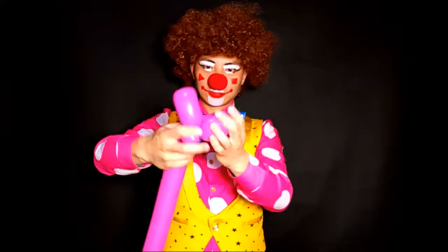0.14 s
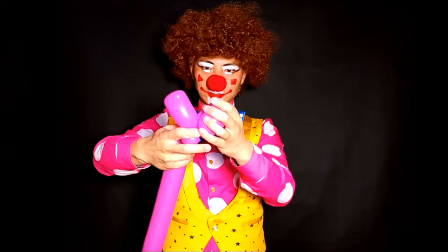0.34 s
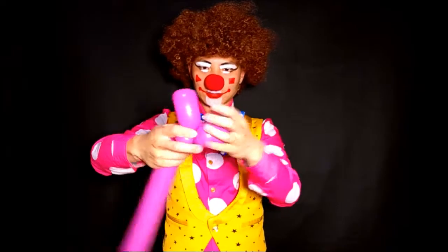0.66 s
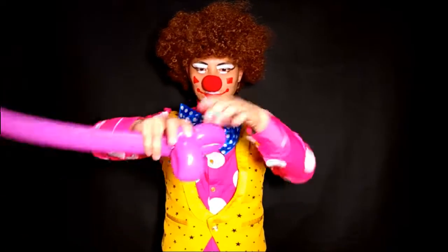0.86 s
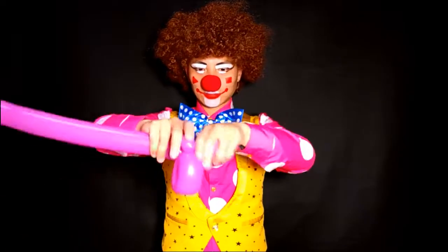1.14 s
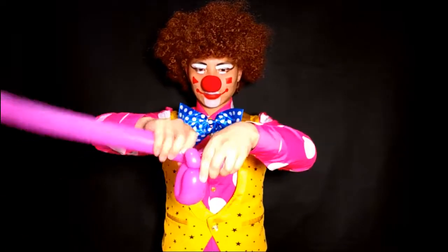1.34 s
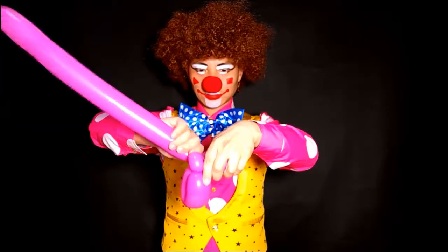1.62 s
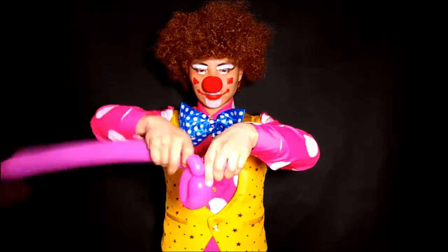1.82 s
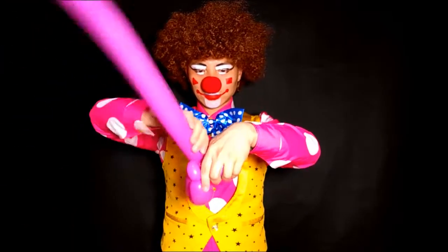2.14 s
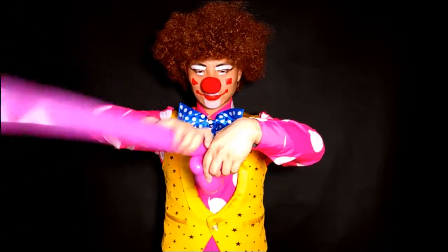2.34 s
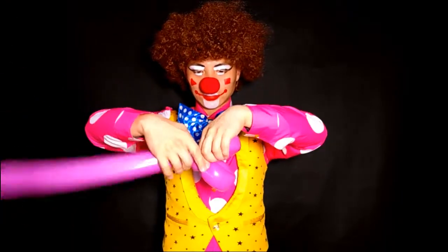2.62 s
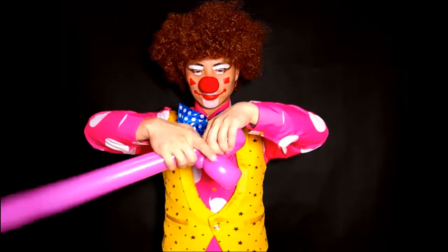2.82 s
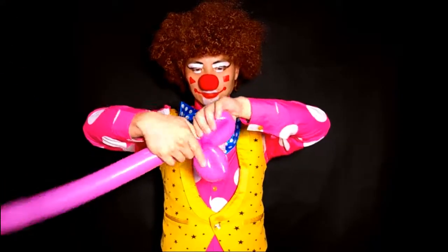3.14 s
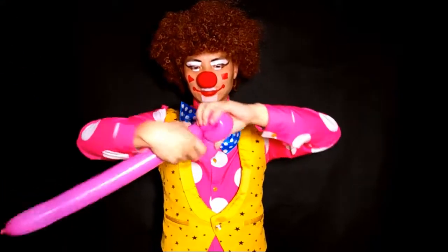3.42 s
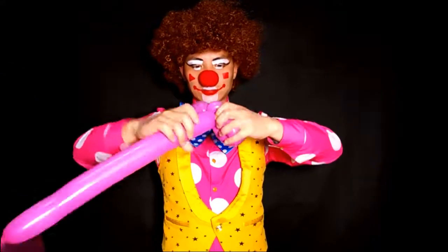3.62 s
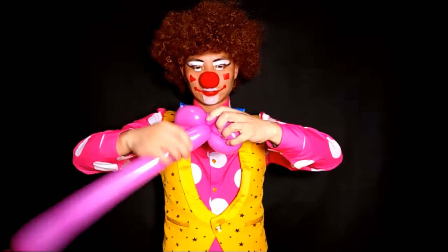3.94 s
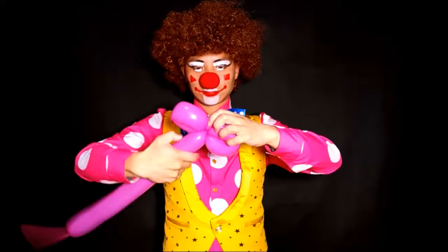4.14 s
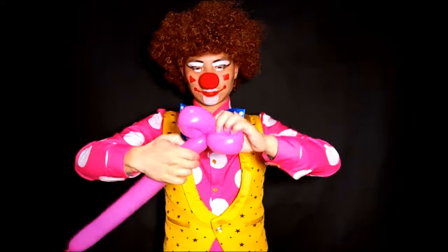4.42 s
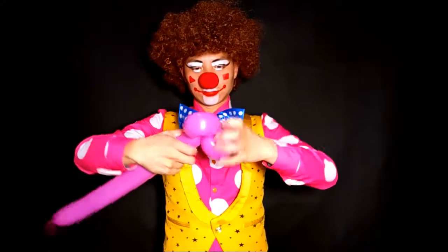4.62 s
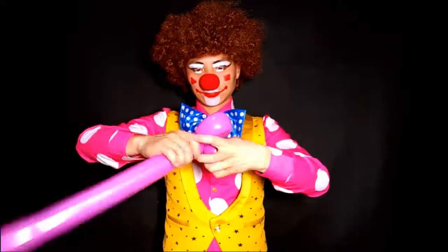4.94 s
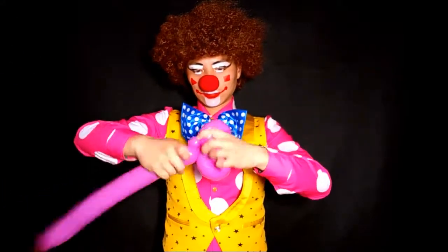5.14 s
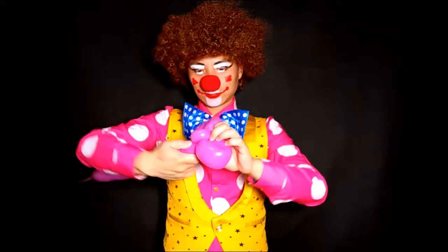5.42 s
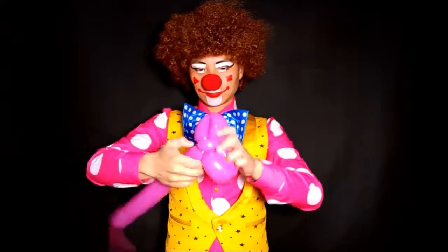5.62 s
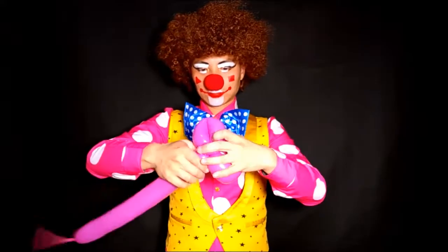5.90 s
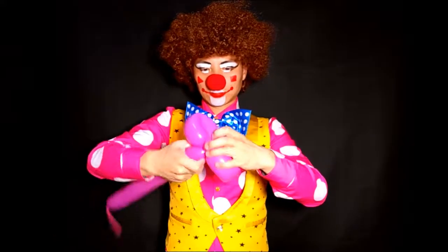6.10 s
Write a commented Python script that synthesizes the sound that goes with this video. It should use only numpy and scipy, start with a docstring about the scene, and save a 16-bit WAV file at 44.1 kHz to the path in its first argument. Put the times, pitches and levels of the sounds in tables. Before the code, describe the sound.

Close, dry indoor sound of a long latex balloon being twisted by hand. Quiet short creaks and a few soft hollow bumps come first, then quicker bursts of gritty rubber rubbing with squeaks and snaps. The middle and later twists are loudest, with hard cracks and brief groans, separated by tiny pauses. A very faint room hush lies beneath.

```python
"""Twisting a long balloon

A long latex balloon is twisted into a loop, heard close up in a small, dry room.
In each stroke of the hands, rubber sticks and slips: trains of tiny clicks creak through skin and trapped air.
Folds snap, patches of skin squeak or groan at one gliding pitch, and pressed or bumped bubbles sound low.
Clicks and noise ring in filters that stand for the balloon; a faint hush lies underneath."""
import sys
import numpy as np
from scipy import signal
from scipy.fft import rfft, irfft
from scipy.io import wavfile
from scipy.ndimage import uniform_filter1d

SR = 44100
rng = np.random.default_rng(int(sys.argv[2]) if len(sys.argv) > 2 else 0)


def put_to_file(sound):
    """Save the sound as 16-bit audio at rate SR, in the file named by the first command-line argument."""
    columns = np.atleast_2d(sound).T  # one column per channel
    safe = np.clip(columns, -1, 1)
    whole_steps = np.round(safe * 32767)
    wavfile.write(sys.argv[1], SR, whole_steps.astype(np.int16))


N = 276355
TIME = np.arange(N) / SR
TICKS = TIME[::32]   # slower clock [s] for the movements of the hands

# noise of the quiet room, a shape only: (frequency [Hz], level [dB per Hz])
HUSH_COLOUR = [(20, -24), (50, -16), (100, 11.5), (200, 15.5), (700, -12), (1500, 3.5), (6000, -8),
               (10000, -18), (14000, -15)]
HUSH_DB = -76

# strokes of the hands, each with its own grip; body, skin and air are relative to the rubbing:
# (start [s], length [s], rubbing level [dB], swell from start to end [dB], attack before the start [s],
#  bubble body [dB], taut skin [dB], air ring [dB], slip rate at that level [per s], unevenness [0-1],
#  bubble pitch [Hz], skin pitch [Hz])
HAND_STROKES = [(.033, .018, -42.5, 0, 0.0055, -28, -26, -1, 210.9, .15, 244.6, 1359),
                (.066, .018, -37, 0, 0.025, -16, -7, -3.5, 210.9, .15, 244, 1343),
                (.13, .014, -37.5, 0, 0.017, -43.5, -35, -1, 897.7, .2, 275, 2250),
                (.19, .085, -40.5, 6, .035, -19.5, -14, -0.5, 329.8, .3, 269.5, 975),
                (.285, .03, -35.5, 0, 0.033, -11.5, -8, -5, 330.2, .25, 258, 939),
                (.33, .16, -41, -19, 0.03, -40, -17, -4, 199.9, .08, 243, 1020),
                (.524, .008, -54, 0, 0.0027, -14, -13, -8, 219.6, .1, 838, 1265),
                (.649, .012, -31.5, 0, 0.0057, -9, -3, -6.5, 600.2, .3, 869, 900),
                (.68, .036, -39.5, -3, 0.028, -2.5, -6, -3.5, 249.9, .4, 216, 913),
                (.862, .135, -44, 4, 0.0072, -7, -0.5, -1.5, 199.8, .5, 700.5, 1219),
                (1.018, .03, -35, -2.5, 0.0093, -8, -4.5, -4, 230.2, .45, 560, 1509),
                (1.075, .08, -37, 4, 0.063, -17, -3.5, -4, 260.1, .3, 221.5, 1397),
                (1.165, .045, -29, 0, 0.012, -21.5, -4.5, -6, 480, .15, 395, 1842),
                (1.28, .145, -37.5, -6, 0.059, -14.5, -3, -8, 281, .35, 450, 1231),
                (1.468, .032, -34.5, -1, 0.069, -7, -2, -9, 200, .3, 399, 1590),
                (1.51, .055, -39.5, -3, 0.031, -23, -4.5, -5, 179.9, .4, 698, 1562),
                (1.6, .055, -34.5, 5, 0.098, -9, -2.5, -5.5, 181.6, .4, 377, 2267),
                (1.69, .16, -35.5, -2, 0.086, -17.5, -6.5, -7.5, 230.2, .3, 600, 2210),
                (1.778, .007, -30, 0, 0.0085, -30, -18, -8, 439.9, .08, 599.4, 2201),
                (1.86, .012, -35.5, 0, .015, -6.5, -2, -2, 229.9, .3, 280, 1900),
                (1.89, .06, -33, 0, 0.055, -4.5, 0, -5.5, 210, .4, 484.3, 1850),
                (1.975, .062, -35.5, -2.5, 0.047, -9, 0, -5.5, 149.8, .2, 396, 1128),
                (2.112, .022, -45, 0, .02, 0, 0.5, -4, 200.4, .4, 450, 1220),
                (2.16, .11, -59, -13, 0.03, -0.5, -5, -8, 239.4, .4, 864, 1246),
                (2.345, .045, -42.5, 9, 0.062, -2, -5, 2.5, 200.1, .4, 824.3, 1826),
                (2.407, .148, -27, -11, .012, -15.5, -4.5, -6.5, 340, .15, 524, 1420),
                (2.6, .12, -44, 2, 0.058, -5.5, 0, 5.5, 300.3, .3, 839, 2157),
                (2.738, .022, -37.5, 0, .02, -6.5, -2.5, 3, 300.1, .3, 697.3, 2156),
                (2.775, .07, -45, 2, 0.028, -10, -1.5, 6.5, 300.1, .3, 840, 2160),
                (2.868, .022, -33, 0, 0.025, -6.5, -2, 0.5, 260.3, .3, 787.5, 1180),
                (2.9, .04, -45, -2, .02, -6.5, -4, 0, 259.8, .3, 601.3, 2021),
                (2.953, .025, -38.5, 0, 0.023, -12, 1, 6, 238.8, .3, 669, 2058),
                (2.99, .075, -45, 10, .02, -15, 0.5, 8.5, 260.5, .3, 669, 2035),
                (3.082, .135, -27, 0, 0.03, -10, -3, -3, 240, .2, 693, 1450),
                (3.235, .155, -30, -12, 0.064, -9.5, -1, -1.5, 220, .22, 325.1, 1572),
                (3.395, .11, -44.5, -14, 0.021, -20, 0, 5, 139.8, .35, 812.6, 1953),
                (3.54, .07, -54, 0, 0.063, -13, -6, -2.5, 150, .35, 802.5, 1953),
                (3.642, .02, -42, -1, 0.054, -17, -5, -6, 241.1, .1, 480, 1910),
                (3.68, .05, -47, -2, 0.025, -5, -3, 1.5, 240.5, .15, 559, 1942),
                (3.744, .055, -29, 0, 0.013, -18, -7.5, -6, 238, .15, 622.8, 1920),
                (3.83, .07, -52, -10, 0.029, -11, -2.5, 5, 200, .3, 610, 1990),
                (3.938, .115, -25.5, 0, 0.031, -13.5, -3.5, -3.5, 200.7, .3, 258, 1140),
                (4.06, .06, -30, -4, 0.036, -10, -2, -4, 279.1, .3, 888.7, 2426),
                (4.135, .06, -28, -10, 0.0055, -9, -6, -3.5, 220.1, .3, 842, 1329),
                (4.241, .05, -35, -2, 0.036, -3.5, 2.5, 3, 99.4, .3, 864, 1585),
                (4.335, .018, -44.5, 0, 0.039, 6.5, 2.5, -1.5, 140.6, .25, 541, 1298),
                (4.43, .135, -23, -1, 0.029, -13.5, -4, -3.5, 185, .12, 685, 1220),
                (4.63, .09, -58, -8, 0.037, -3, 0.5, 2, 130.3, .15, 819.6, 833.3),
                (4.82, .012, -57, 0, .02, 3.5, 9.5, -4, 130.5, .15, 260, 1301),
                (4.76, 0.177, -67, 3, 0.11, 2, 1, -2, 300, .2, 259.2, 1330),
                (4.94, .085, -43.5, 18.5, 0.076, -16.5, -9.5, 0.5, 175.7, .15, 729, 1410),
                (5.039, .06, -28, -7, 0.0045, -14, -2.5, -3, 179.5, .2, 725.4, 2395),
                (5.13, .18, -31.5, 4, 0.068, -3.5, -5.5, -2, 230.8, .3, 510.6, 1530),
                (5.33, .08, -33.5, 0, 0.057, -1, -5, -1.5, 239.8, .25, 489.2, 881),
                (5.42, .07, -29, 6.5, 0.045, -4.5, -3.5, -3.5, 298.5, .3, 523.2, 2201),
                (5.51, .085, -34, -7, 0.032, -5, -6, -1, 250.8, .3, 516, 2080),
                (5.625, .022, -28, 0, 0.049, -10, -4, -2, 209.6, .3, 439.5, 1470),
                (5.69, .04, -41, -4, 0.045, -3, -4.5, 2, 168.7, .35, 614, 2348),
                (5.778, .03, -34, 0, 0.055, -15, -5, -1, 140, .35, 549.5, 1840),
                (5.83, .075, -49, -10.5, 0.033, -11, -5, 2.5, 140.1, .35, 546, 1824),
                (5.927, 0.032, -41.5, -3.5, 0.039, -16, -10, -0.5, 171, .35, 578.4, 1894),
                (5.985, .07, -43.5, -7.5, 0.032, -10.5, -2.5, -3, 169.3, .35, 573.4, 1892),
                (6.076, 0.021, -38.5, 0.5, 0.041, -19, -8, 6, 215.1, .3, 502.7, 1610),
                (6.116, .154, -36, -11.5, 0.054, -14, -8.5, 0.5, 214.8, .3, 393, 1501)]
ATTACK_DB = 20   # the level climbs this much within the attack time
RELEASE_DB_PER_S = 450   # the rubber stops sliding
BODY_RELEASE_DB_PER_S, AIR_RELEASE_DB_PER_S = 337, 240   # bubble and trapped air fade more slowly
CREEP_DB, CREEP_DB_PER_S = -25, 150   # after a stroke it creeps on faintly as the grip relaxes
BODY_ARCH_DB = 2   # the fingers press hardest in mid-stroke: the body is this much weaker at both ends
DB_PER_DOUBLING = 16   # faster sliding is louder: the slip rate doubles with this much level
SLIP_MEMORY = .8   # 0-1: each stick lasts much like the one before, so slips come in even runs
TREMOR_DB, TREMOR_PER_S = 0.89, 30   # the pressure of the fingers is never quite steady
WANDER_OCTAVES, WANDER_PER_S = 0.097, 18   # the pinched resonances wander as the fingers shift
BUBBLE_SHARPNESS, SKIN_SHARPNESS = 2.4, 5.9   # pitch divided by resonance width

# how dry the grip is, as the height of single slips over the ringing between them: (time [s], height [dB])
GRIP_CRISPNESS = [(0.1, -2), (.8, -2), (1.1, 2), (1.6, 2), (1.75, 3.5), (2.03, 4), (2.15, -1), (2.45, 0),
                  (2.62, -3), (3.05, -2), (3.2, 0), (3.5, 0), (3.9, -1), (4.55, -1), (4.95, -2.5), (5.3, 0)]
# filter that colours the slips: (frequency [Hz], gain [dB])
SLIP_FILTER = [(60, -16), (150, -11), (300, -9), (500, -1.5), (800, -6), (1300, -3), (2500, 0), (4000, 1.5),
               (5700, 1.5), (6800, -2.5), (8000, -10), (9500, -22.5), (10800, -31.5), (12500, -48)]
# resonances of the rubbed balloon: (frequency [Hz], width [Hz], lift [dB])
BALLOON_RESONANCES = [(257.4, 33, 5.5), (480, 34, 1.5), (965, 26, 3.5), (1387, 160, 5.5)]

# a light grip (more air than rubbing) lets the trapped air ring on: base [dB], change [dB per dB]
AIR_RING_DB, AIR_RING_FOLLOWS = -14, 1.7
# the first air mode across the tube
CROSS_MODE_HZ, CROSS_MODE_WIDTH_HZ, CROSS_MODE_DB = 5450, 700, 0.5

# fingers pressing into a bubble: (time [s], rumble level [dB])
FINGER_PRESSES = [(0.3, -55.5), (.71, -45), (.89, -53.5), (1.02, -50), (1.41, -64), (2.0, -48), (2.17, -63),
                  (2.45, -54), (2.96, -54.5), (3.27, -50.5), (4.18, -55.5), (4.49, -47.5), (4.815, -46.5),
                  (5.18, -58), (5.245, -63), (5.845, -48), (6.14, -56)]
PRESS_RISE_DB_PER_S, PRESS_FALL_DB_PER_S = 498, 282
STROKE_RUMBLE_DB = -37.5   # every stroke stirs the low modes too, relative to its body
# what a pressed or bumped bubble rings with: (frequency [Hz], level [dB], time to fade by 60 dB [s])
LOW_BUBBLE_MODES = [(90, -13, 0.063), (135, -10.5, 0.15), (184, 6.5, 0.018), (258, -5.5, 0.15),
                    (282, -32, .07)]

# folds letting go; levels before the common offsets and filters in snaps():
# (time [s], crack level [dB], crack pitch [Hz], early flutter against the crack [dB])
FOLD_SNAPS = [(.0355, -27, 4800, 2), (.0713, -15, 5000, 0), (.0773, -19, 5000, 0), (.2983, -19, 4400, 2),
              (.3484, -18, 4800, 4), (.5228, -28, 5600, -1), (.5272, -28, 5300, -1), (.5317, -28, 5200, -1),
              (.6971, -21, 4700, 5), (.7137, -22, 4700, 7), (.8535, -27, 4500, -3), (.8566, -26, 3800, -3),
              (.8695, -20, 4700, 5), (.8877, -18, 4300, 4), (.9152, -23, 4400, -4), (.924, -22, 4500, 4),
              (.9467, -20, 3600, 6), (.9596, -21, 3700, 6), (.9712, -19, 3800, 4), (.983, -16, 3800, 3),
              (1.0161, -15, 3800, 3), (1.1179, -18, 4200, 2), (1.1489, -19, 4600, 1), (1.2221, -8, 4400, 3),
              (1.2338, -9, 4600, 2), (1.2362, -11.5, 4200, 1), (1.4693, -17.5, 3600, 2),
              (1.4839, -17, 3600, 1), (1.6588, -11, 3200, 2), (1.9033, -13, 4400, -3),
              (1.9182, -13, 5000, -3), (1.9458, -5, 4300, -6), (1.9792, -17, 3000, -4),
              (1.9942, -16, 2800, 0), (2.0283, -19, 2000, -2), (2.0347, -19, 2000, -2),
              (2.3733, -17, 4700, 5), (2.3943, -8, 4300, -2), (2.405, -3.5, 4100, 1),
              (2.4193, -4.5, 4900, 1), (2.5069, -16, 5000, 3), (2.6622, -20, 5200, 0),
              (2.7234, -17, 5100, 5), (2.7391, -18, 5000, 4), (2.8484, -15, 5600, 3),
              (2.8608, -15, 5700, 3), (2.886, -14, 5400, 0), (2.9608, -10, 5700, -1),
              (2.9675, -9.5, 5200, -1), (3.0845, -10, 4300, 4), (3.0885, -7, 4500, 3),
              (3.0925, -9, 3800, 3), (3.1152, -11, 4600, 1), (3.1276, -11, 4600, 1),
              (3.1822, -10, 5000, -1), (3.3754, -15, 5200, 1), (3.3927, -14, 5400, 0),
              (3.5052, -29, 2400, 2), (3.7441, -14, 5100, 3), (3.9354, -10, 3700, 2), (4.0008, -9, 4100, 4),
              (4.1318, 3, 5600, 1), (4.2395, -10, 4400, 0), (4.2537, -15, 4400, 2), (4.2896, -15, 4400, 1),
              (4.4062, -20, 4400, 3), (4.4407, -6.5, 3700, 2), (4.45, -6.5, 3900, 2),
              (4.5501, -6.5, 5700, 0), (4.5664, -5.5, 5800, 1), (4.6622, -30, 5300, 2),
              (5.0314, -7.5, 3600, 1), (5.0371, 1, 3400, 1), (5.4848, -11, 4200, 2), (5.6402, -12, 4400, 3),
              (5.7873, -15, 4600, 0), (5.8003, -17, 4600, 0), (5.994, -20, 4400, 3), (6.0687, -21, 5000, 3),
              (6.1121, -7.5, 5200, 1), (6.1344, -8.5, 5100, 0), (6.1452, -8.5, 5100, 0)]
# small wrinkles snap at random; their level is set over the rubbing
WRINKLES_PER_S, WRINKLE_DB, WRINKLE_SPREAD_DB = 6, 7.5, 1.5
WRINKLE_HZ, WRINKLE_FLUTTER_DB = 4500, 9.5

# a tight patch of skin squeaks or a bubble groans at one pitch; levels before a common offset:
# (start [s], length [s], starting pitch [Hz], glide [octaves], level [dB])
SKIN_SQUEAKS = [(0.179, 0.032, 890, 0.2, -39.5), (0.227, 0.11, 939, 0.18, -37.5),
                (0.433, 0.048, 2834, 0.13, -48.5), (0.521, 0.02, 1154, 0.056, -39.5),
                (1.159, 0.053, 1830, 0.016, -42), (1.25, 0.096, 510, 0.76, -33.5),
                (1.353, 0.08, 380, -0.43, -39), (1.595, 0.064, 241, -0.013, -37),
                (1.926, 0.029, 835, -1.27, -24), (1.951, 0.049, 464, -0.11, -36),
                (2.001, 0.079, 1095, 0.062, -28.5), (2.04, 0.2, 1180, -0.13, -45),
                (2.473, 0.016, 1317, -0.3, -25), (2.503, 0.066, 260, 0.23, -42.5),
                (2.598, 0.056, 269.7, -0.18, -43), (2.659, 0.041, 581.6, 0.068, -38.5),
                (2.78, 0.09, 2150, -0.28, -35), (3.014, 0.036, 2100, -0.14, -27),
                (3.05, 0.041, 1778, -0.063, -28), (3.13, 0.021, 480, 0.17, -26),
                (3.206, 0.067, 232.2, 0.033, -31), (3.261, 0.052, 1304, -0.12, -21),
                (3.377, 0.057, 1880, -0.058, -31.5), (3.42, 0.29, 2010, -0.19, -48.5),
                (3.686, 0.11, 480, 1, -37.5), (3.768, 0.069, 558.2, 0.31, -39),
                (3.922, 0.044, 997, 0.13, -18), (3.964, 0.072, 262.3, -0.21, -29.5),
                (4.244, 0.051, 220.5, .3, -36), (4.39, 0.046, 490, 0.089, -28.5),
                (4.641, 0.064, 777, -0.28, -45.5), (4.818, 0.019, 1306, -0.093, -37),
                (5.266, 0.066, 288, 0.55, -29), (5.32, 0.11, 475.6, -0.21, -31.5),
                (5.466, 0.096, 3735, -0.043, -26.5), (5.635, 0.021, 1331, 0.17, -23)]
SQUEAK_SHARPNESS = 5.5   # at 1 kHz

# hands bumping a bubble; levels before a common offset: (time [s], level [dB])
HAND_BUMPS = [(0.697, -31), (0.714, -21), (0.728, -35), (4.706, -43.5), (4.777, -42), (4.792, -36),
              (4.813, -39), (5.846, -28.5)]

CUTOFF_HZ = 16000


def from_db(db):
    """Decibels to gain."""
    return 10 ** (np.asarray(db) / 20)


def band(x, low_hz, high_hz, order=3):
    """Keep the frequencies between two limits, using only past samples."""
    limits = [low_hz, min(high_hz, .45 * SR)]
    sections = signal.butter(order, limits, "band", fs=SR, output="sos")
    return signal.sosfilt(sections, x + 1e-18)


def coloured(x, spectrum):
    """Filter through (frequency [Hz], gain [dB]) points; minimum phase, so that nothing sounds early."""
    hz, db = np.transpose(spectrum)
    size = 4096
    grid = np.maximum(np.fft.rfftfreq(size, 1 / SR), 1)
    gain = from_db(np.interp(np.log(grid), np.log(hz), db))
    # folding the cepstrum (the spectrum of the log gain) forward in time makes the filter minimum phase
    cepstrum = irfft(np.log(gain))
    cepstrum[1:size // 2] *= 2
    cepstrum[size // 2 + 1:] = 0
    response = irfft(np.exp(rfft(cepstrum)))
    return signal.oaconvolve(x, response)[:len(x)]


def resonance(x, hz, width_hz):
    """Two-pole resonance with gain 1 on top."""
    r = np.exp(-np.pi * width_hz / SR)
    top = np.array([1, 0, -1]) * (1 - r * r) / 2
    feedback = [1, -2 * r * np.cos(2 * np.pi * hz / SR), r * r]
    return signal.lfilter(top, feedback, x + 1e-18)


def moving_resonance(x, hz, sharpness, block=64):
    """A resonance whose centre moves, its state carried from block to block."""
    out, state = np.zeros(len(x)), np.zeros(2)
    for i in range(0, len(x), block):
        w = 2 * np.pi * hz[i] / SR
        r = np.exp(-w / (2 * sharpness))
        gain = (1 - r * r) / 2
        feedback = [1, -2 * r * np.cos(w), r * r]
        out[i:i + block], state = signal.lfilter([gain, 0, -gain], feedback, x[i:i + block], zi=state)
    return out


def tail(t60, size):
    """Dense random reflections that fade by 60 dB in t60 seconds; energy 1."""
    h = rng.standard_normal(size) * np.exp(-np.log(1000) * np.arange(size) / SR / t60)
    return h / np.sqrt(np.sum(h ** 2))


def evened(x, size=900):
    """Hold the running loudness (rms) near 1 and leave the single slips standing out."""
    power = uniform_filter1d(uniform_filter1d(x ** 2, size), size)
    return x / np.sqrt(np.maximum(power, 1e-14))


def per_sample(values):
    """From the slow ticks of the hands to every sample."""
    return np.interp(TIME, TICKS, values)


def waver(per_s, size=1000):
    """Slow random wandering around 0: straight lines between chance values of spread 1."""
    return np.interp(TIME * per_s, np.arange(size), rng.standard_normal(size))


def hush():
    """The quiet room: steady coloured noise."""
    noise = coloured(rng.standard_normal(N), HUSH_COLOUR)
    return from_db(HUSH_DB) * noise / noise.std()


def stroke_envelopes(release_db_per_s, arch_db=0):
    """One row of dB per stroke: an attack, a hold that swells or sags, a release that ends in a faint creep."""
    start, length, db, swell, attack = np.transpose(HAND_STROKES)[:5, :, None]
    before = np.maximum(start - TICKS, 0)
    after = np.maximum(TICKS - start - length, 0)
    from_middle = np.clip((TICKS - start) / length, 0, 1) - .5
    hold = db + swell * from_middle - arch_db * (2 * from_middle) ** 2
    release = np.maximum(-release_db_per_s * after, CREEP_DB - CREEP_DB_PER_S * after)
    return hold - ATTACK_DB * before / attack + release


def stroke_levels():
    """Levels in dB of rubbing, bubble body, taut skin and air ring; the strongest stroke leads each layer."""
    body, taut, air = np.transpose(HAND_STROKES)[5:8, :, None]
    rubbing = stroke_envelopes(RELEASE_DB_PER_S)
    body_layer = stroke_envelopes(BODY_RELEASE_DB_PER_S, BODY_ARCH_DB) + body
    air_layer = stroke_envelopes(AIR_RELEASE_DB_PER_S) + air
    layers = (rubbing, body_layer, rubbing + taut, air_layer)
    return [per_sample(layer.max(axis=0)) for layer in layers]


def grip(size=30):
    """Slip rate, unevenness and both pitches glide to the leading stroke's; the rate follows its effort."""
    envelopes = stroke_envelopes(RELEASE_DB_PER_S)
    leading = np.array(HAND_STROKES)[envelopes.argmax(axis=0)].T
    _, _, db, *_, per_s, uneven, bubble_hz, skin_hz = leading
    effort_db = envelopes.max(axis=0) - db
    per_s = per_s * 2 ** np.maximum(effort_db / DB_PER_DOUBLING, -1)   # never below half the rate
    controls = (per_s, uneven, bubble_hz, skin_hz)
    return [per_sample(uniform_filter1d(control, size)) for control in controls]


def slips(per_s, uneven, stray_share, stray_db):
    """Strain builds with the sliding and lets go in steps; small stray slips fall in between."""
    travel = np.cumsum(per_s) / SR   # counted in slips
    steps = np.arange(int(travel[-1]))
    fresh_share = np.sqrt(1 - SLIP_MEMORY ** 2)
    chance = signal.lfilter([fresh_share], [1, -SLIP_MEMORY], rng.standard_normal(len(steps)))
    spacing = np.exp(chance * np.interp(steps, travel, uneven))
    slip_travel = np.cumsum(spacing / spacing.mean())
    at = np.minimum(np.searchsorted(travel, slip_travel), N - 1)
    train = np.zeros(N)
    train[at] = np.sqrt(spacing)   # a longer stick, a harder slip
    train[-1] = 0   # drop slips that fall past the end
    falls = rng.random(N) < stray_share * per_s / SR
    stray = falls * rng.uniform(-1.11, 1, N) * np.sqrt(2)
    return train + from_db(stray_db) * stray


def skin(train, ring_db, ring_t60, count=6, size=3000):
    """A click, a brief flutter, then waves round the skin; each spot of contact has its own pattern."""
    stay = size // 4   # samples before the contact may move to another spot
    spot = np.repeat(rng.integers(0, count, N // size * 4 + 8), stay)[:N]
    out = train
    for k in range(count):
        here = train * (spot == k)
        flutter = from_db(-4.5) * signal.oaconvolve(here, tail(.004, size // 10))[:N]
        ring = from_db(ring_db) * signal.oaconvolve(here, tail(ring_t60, size))[:N]
        out = out + flutter + ring
    return out


def tube_air(x, ring_db, ring_t60, size=12000):
    """Above about 5 kHz sound fits across the tube and rings on in the air, most in the first cross mode."""
    ring = signal.oaconvolve(x, tail(ring_t60, size))[:N]
    ring = ring + from_db(CROSS_MODE_DB) * resonance(ring, CROSS_MODE_HZ, CROSS_MODE_WIDTH_HZ)
    return from_db(ring_db) * band(ring, 5130, 7600, order=10)


def creak(body_db, taut_db, rub_db, air_db):
    """Slips ring through the balloon; the grip decides how much body, skin and air answer, and the pitch."""
    rubbing, body, taut, air = stroke_levels()
    per_s, uneven, bubble_hz, skin_hz = grip()
    crisp_db = np.interp(TIME, *np.transpose(GRIP_CRISPNESS))
    train = slips(per_s, uneven, stray_share=2.0, stray_db=-3.5 - crisp_db)
    rubbed = coloured(skin(train, ring_db=2 - crisp_db, ring_t60=.034, count=14), SLIP_FILTER)
    for hz, width_hz, lift_db in BALLOON_RESONANCES:
        rubbed = rubbed + (from_db(lift_db) - 1) * resonance(rubbed, hz, width_hz)

    bubble_pitch = bubble_hz * 2 ** (WANDER_OCTAVES * waver(WANDER_PER_S))
    bubble = rubbed + from_db(7) * moving_resonance(rubbed, bubble_pitch, BUBBLE_SHARPNESS)
    skin_pitch = skin_hz * 2 ** (WANDER_OCTAVES * waver(WANDER_PER_S))
    pinched = rubbed + from_db(2) * moving_resonance(rubbed, skin_pitch, SKIN_SHARPNESS)

    voice = from_db(body + body_db) * evened(band(bubble, 187, 838, order=4))
    voice += from_db(taut + taut_db) * evened(band(pinched, 877, 2254, order=3))
    voice += from_db(rubbing + rub_db) * evened(band(rubbed, 2300, 5350, order=3))

    # the air inside answers the same slips by paths of its own
    inside = coloured(skin(train, ring_db=2.5 - crisp_db, ring_t60=.034, count=10), SLIP_FILTER)
    ring_db = AIR_RING_DB + AIR_RING_FOLLOWS * np.clip(air - rubbing, -8, 8)
    air_sound = band(inside, 5150, 10400, order=6) + tube_air(inside, ring_db, ring_t60=0.2)
    voice += from_db(air + air_db) * evened(air_sound)

    tremor = from_db(TREMOR_DB * waver(TREMOR_PER_S))
    return tremor * voice + squeaks(rubbed, level_db=-8.0, sharpness=SQUEAK_SHARPNESS)


def kneading():
    """Level in dB of the low rumble: each press rises and falls; strokes stir it where they are stronger."""
    s, db = np.transpose(FINGER_PRESSES)[:, :, None]
    rise, fall = PRESS_RISE_DB_PER_S * (s - TICKS), PRESS_FALL_DB_PER_S * (TICKS - s)
    presses = db - np.maximum(rise, fall)
    return np.maximum(per_sample(presses.max(axis=0)), stroke_levels()[1] + STROKE_RUMBLE_DB)


def rumble(level_db, low_hz, high_hz):
    """Fingers knead the bubbles and stir their lowest modes: noise through resonances."""
    push = rng.standard_normal(N)
    modes = sum(from_db(db) * resonance(push, hz, np.log(1000) / (np.pi * t60))
                for hz, db, t60 in LOW_BUBBLE_MODES)
    low = band(modes + from_db(-11.0) * push, low_hz, high_hz, order=2)
    return from_db(kneading() + level_db) * evened(low, size=5000)


def sticking(hold_db, hold_s, size=2500):
    """Gain of the rubbing: before a fold snaps the rubber catches and the small slips die down."""
    db = np.zeros(N)
    for s, *_ in FOLD_SNAPS:
        at = int(s * SR)
        wait = np.arange(min(at, size))[::-1] / SR   # time left until the snap
        span = slice(at - len(wait), at)
        db[span] = np.minimum(db[span], hold_db * np.exp(-wait / hold_s))
    return from_db(uniform_filter1d(uniform_filter1d(db, size=30), size=30))


def wrinkles(count=200):
    """Rows like FOLD_SNAPS for small wrinkles that let go at random, as strong as the rubbing allows."""
    times = np.cumsum(rng.exponential(1, count)) / WRINKLES_PER_S
    rubbing = np.interp(times, TIME, stroke_levels()[0])
    peaks = rubbing + WRINKLE_DB + WRINKLE_SPREAD_DB * rng.standard_normal(count)
    return [(s, db, WRINKLE_HZ, WRINKLE_FLUTTER_DB) for s, db in zip(times, peaks) if s < TIME[-1]]


def snaps(level_db, crack_cycles, flutter_db, flutter_t60, ring_db, ring_t60, size=5000):
    """A fold jumps: a crack of a cycle or two, a quick flutter of the fold, then the whole skin rings."""
    out, t = np.zeros(N + size), np.arange(size) / SR
    for s, peak_db, hz, loose_db in FOLD_SNAPS + wrinkles():
        crack = np.sin(2 * np.pi * hz * t) * (hz * t) * np.exp(-2 * hz * t / crack_cycles)
        crack *= from_db(peak_db + level_db) / np.abs(crack).max()
        shake = rng.standard_normal(size)
        shake = band(shake + 2 * resonance(shake, hz, hz / 2), 1270, 5930, order=2)
        shake = np.tanh(shake / shake.std())   # the taut skin limits its swing
        flutter_fade = from_db(-60 * t / flutter_t60)
        ring_fade = from_db(ring_db - loose_db - 60 * t / ring_t60)
        onset = np.minimum(hz * t / 2, 1) ** 2   # the waves build up over two cycles
        waves = shake * (flutter_fade + ring_fade) * onset
        early = np.linalg.norm(waves[:size // 25])   # strength in the first few milliseconds
        waves *= from_db(loose_db + flutter_db) * np.linalg.norm(crack) / early
        at = int(s * SR)
        out[at:at + size] += crack + waves
    out = band(band(out[:N], 420, 9900, order=4), 80, 8860, order=6)
    # the hardest cracks flatten and turn brighter
    out = band(np.clip(out, -.88, .88), 400, 18000, order=2)
    return out + tube_air(out, ring_db=-15.0, ring_t60=0.18)


def squeaks(x, level_db, sharpness, size=2000):
    """The slips keep pumping one sharp resonance, which swells, glides with the tension and fades."""
    out = np.zeros(N)
    for s, length, hz, glide, db in SKIN_SQUEAKS:
        span = slice(int(s * SR) - size, int((s + length) * SR) + size)
        progress = np.clip((TIME[span] - s) / length, 0, 1)
        pitch = hz * 2 ** (glide * progress)
        q = sharpness * np.sqrt(hz / 1000)   # high squeaks are purer than low groans
        tone = moving_resonance(moving_resonance(x[span], pitch, q), pitch, q / 2)
        out[span] += from_db(db + level_db) * np.sin(np.pi * progress) * evened(tone)
    return out


def bumps(level_db, soft_hz, size=12000):
    """A soft push sets the low modes of a bubble ringing: sines that die away."""
    out, t = np.zeros(N + size), np.arange(size) / SR
    for s, db in HAND_BUMPS:
        at = int(s * SR)
        for hz, mode_db, t60 in LOW_BUBBLE_MODES:
            fade = np.exp(-np.log(1000) * t / t60)
            out[at:at + size] += from_db(db + mode_db + level_db) * np.sin(2 * np.pi * hz * t) * fade
    return band(out[:N], 90, soft_hz, order=2)


def room(x, wet_db, t60, size=20000):
    """A short, faint tail from the draped room, after a gap of 5.4 ms."""
    gap = np.zeros(int(0.0054 * SR))
    echoes = signal.oaconvolve(x, np.concatenate([gap, tail(t60, size)]))[:N]
    return x + from_db(wet_db) * band(echoes, 74, 8800, order=4)


def scene():
    """Balloon and room hush, the same in both channels."""
    balloon = creak(body_db=-1.18, taut_db=0.27, rub_db=0.8, air_db=0.7)
    balloon *= sticking(hold_db=-5, hold_s=.007)
    balloon += snaps(level_db=0.3, crack_cycles=.9, flutter_db=-3.2, flutter_t60=.012,
                     ring_db=-18, ring_t60=.07)
    balloon += rumble(level_db=0.0, low_hz=60, high_hz=185)
    balloon += bumps(level_db=-9.0, soft_hz=450)
    mono = room(balloon, wet_db=-9.5, t60=0.11) + hush()
    return np.stack([mono, mono])


def record(dry):
    """Peaks beyond full scale are clipped flat; then the top of the treble is cut."""
    clipped = np.clip(dry, -1, 1)
    treble_cut = signal.cheby2(12, 70, CUTOFF_HZ, fs=SR, output="sos")   # 70 dB down from the cutoff up
    return signal.sosfilt(treble_cut, clipped)


dry = scene()
out = record(dry)
put_to_file(out)
```